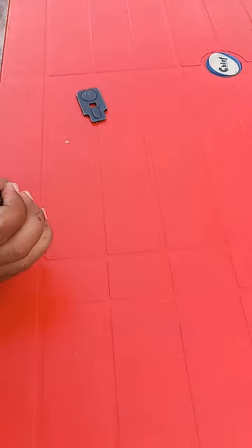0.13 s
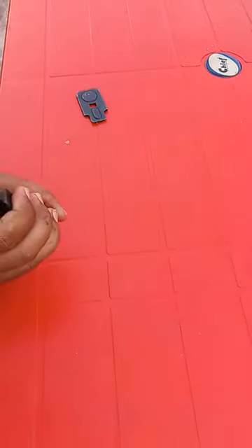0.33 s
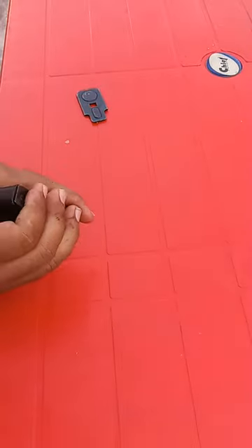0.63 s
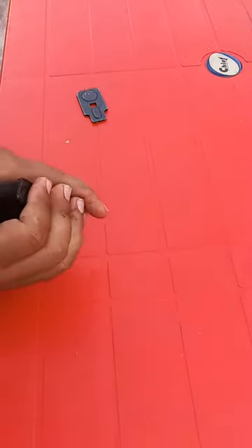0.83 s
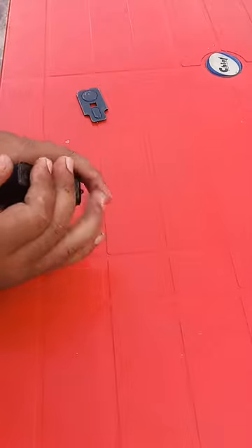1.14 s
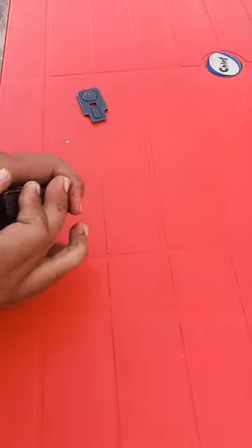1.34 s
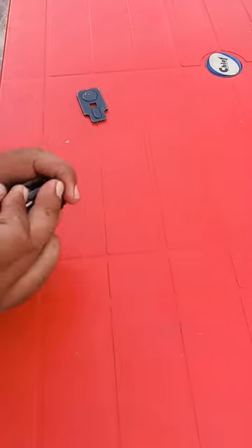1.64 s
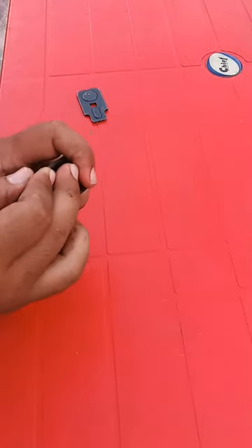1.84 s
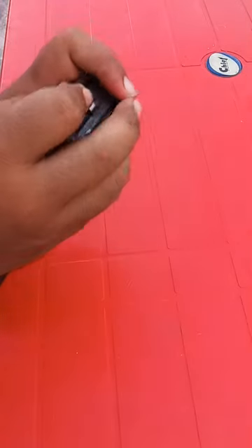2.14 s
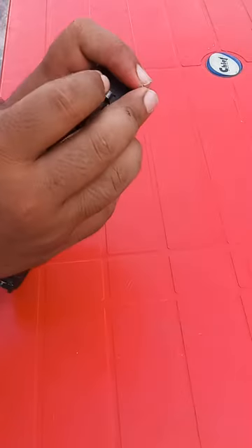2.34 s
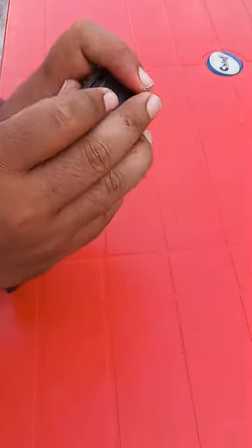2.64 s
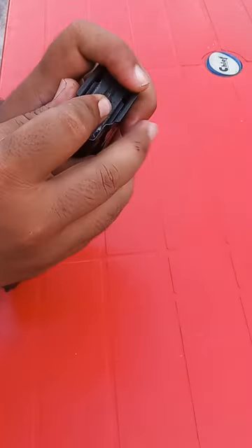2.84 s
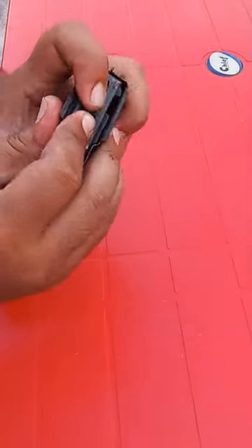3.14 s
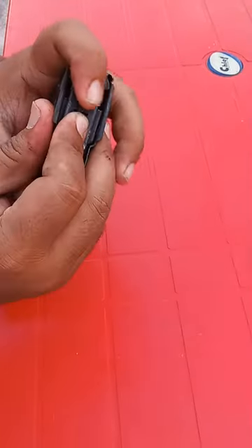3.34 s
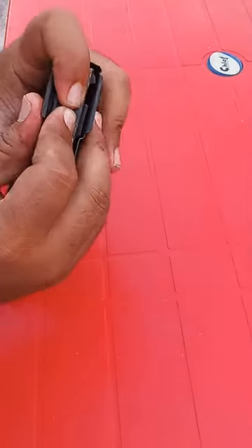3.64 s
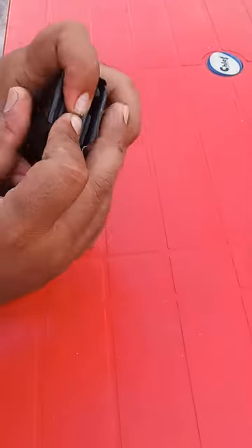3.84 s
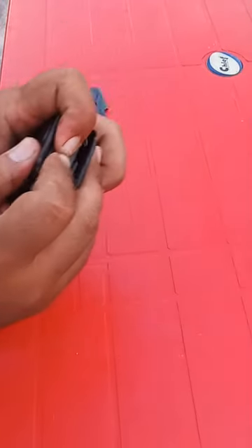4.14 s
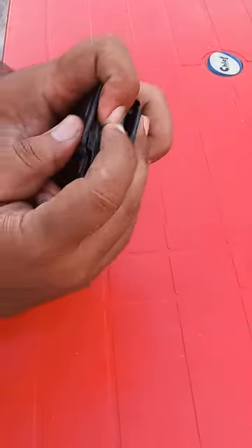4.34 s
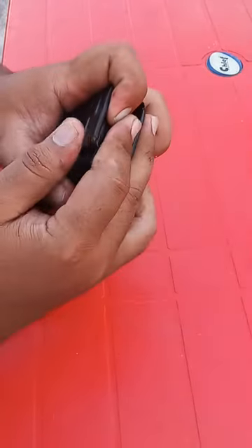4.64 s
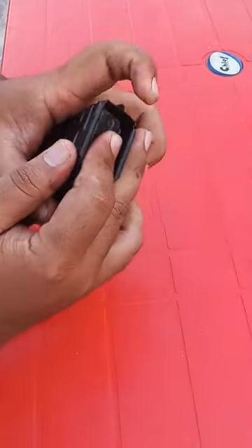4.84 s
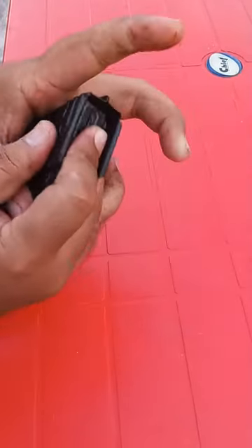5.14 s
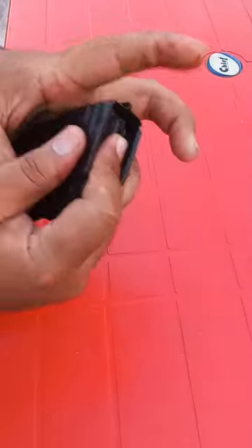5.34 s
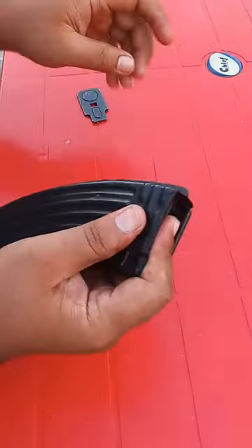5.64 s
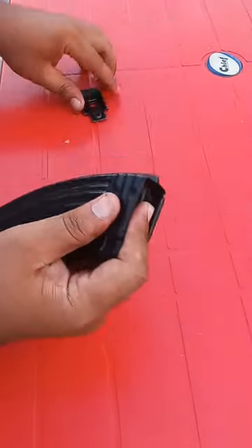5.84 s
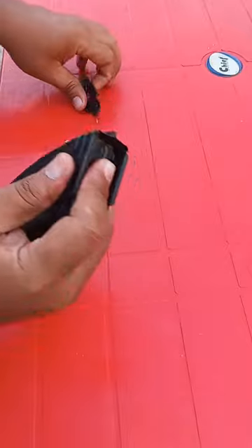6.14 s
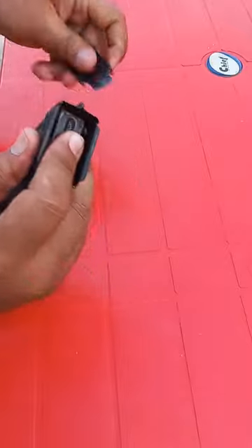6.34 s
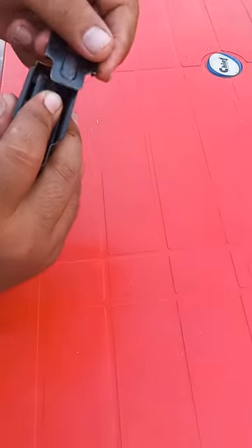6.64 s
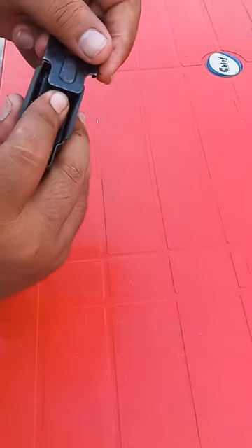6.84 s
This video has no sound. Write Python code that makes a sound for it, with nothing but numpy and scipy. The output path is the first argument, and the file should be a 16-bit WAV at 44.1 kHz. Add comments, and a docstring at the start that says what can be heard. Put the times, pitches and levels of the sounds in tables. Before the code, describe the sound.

Irregular handwork with small steel parts on a hollow plastic table outdoors, heard close and dry. First come bright, ringing catches and rough drags of a coil spring, then tighter snaps, ticks and short rubs with the tube muffled by fingers. Dull thumps and rumbles of the table punctuate them. It calms, a light plate is scraped up and slides against steel, while faint chirps and a late far horn sit behind.

```python
"""Sharp scrapes and catches come first: a steel spring is fed by hand into the open tube of a rifle magazine.
It rests on a plastic table close to the microphone; stick-slip pulses excite steel, tube air and coil modes.
Fingers then cover the end and press the spring home in sharp clicks; rubs, squeaks and bumps lie between.
The magazine knocks on the table, whose modes boom under a grainy scuff, and a small plate is picked up.
Far away, gliding sines make birds and two wavering partials a horn, over the shaped noise of outdoor air."""
import sys
import numpy as np
from scipy import signal
from scipy.fft import rfft, irfft
from scipy.io import wavfile

SR = 44100
rng = np.random.default_rng(int(sys.argv[2]) if len(sys.argv) > 2 else 0)


def inscribe(sig):
    """Save sig as 16-bit PCM at rate SR to the path in sys.argv[1].

    A 1-D sig is mono; a 2-D sig holds one channel per row.
    Samples are clipped to [-1, 1] before scaling.
    """
    pcm = np.round(np.clip(np.atleast_2d(sig).T, -1, 1) * 32767)
    wavfile.write(sys.argv[1], SR, pcm.astype(np.int16))


N = 307377
TIME = np.arange(N) / SR
AGE = TIME[:SR * 2 // 5]  # seconds since a blow or the start of a stroke


def undb(db):
    """Decibels to gain."""
    return 10 ** (np.asarray(db) / 20)


def level(x, db):
    """Set the rms of a steady sound."""
    return x * undb(db) / np.sqrt(np.mean(x ** 2))


def burst(x, db):
    """Set the energy of a blow, as its rms if packed into 5 ms."""
    return x * undb(db) / np.sqrt(np.sum(x ** 2) / (SR / 200))


def add(out, s, x):
    """Mix x into out from time s."""
    start = max(int(s * SR), 0)
    out[start:start + len(x)] += x[:max(N - start, 0)]


def through(x, response):
    """Pass x through an impulse response."""
    return signal.fftconvolve(x, response)[:len(x)]


def cut(x, hz, kind, order=3):
    """High-pass or low-pass."""
    return signal.sosfilt(signal.butter(order, hz, kind, fs=SR, output="sos"), x)


def fade(t60):
    """Exponential decay, 60 dB down after t60 seconds."""
    return np.exp(-np.log(1000) * AGE / max(t60, 1e-4))


def noise(t60):
    """A dying burst of noise: countless overlapping modes."""
    return rng.standard_normal(len(AGE)) * fade(t60)


def walk(rate):
    """Smooth random wandering through rate new values a second, spread near 1."""
    knots = rng.standard_normal(int(N / SR * rate) + 2)
    return np.interp(TIME * rate, np.arange(len(knots)), knots)


def swell(length):
    """One smooth rise and fall of pressure."""
    return np.sin(np.pi * np.minimum(AGE / length, 1))


def colour(points, size=2048):
    """Causal (minimum-phase) impulse response with the given spectrum."""
    hz, db = np.transpose(points)
    bin_hz = np.arange(size // 2 + 1) * SR / size
    log_gain = np.log(undb(np.interp(np.log(bin_hz + 1), np.log(hz), db)))
    # folding the cepstrum onto positive times makes the response causal
    cepstrum = irfft(log_gain)
    cepstrum[1:size // 2] *= 2
    cepstrum[size // 2 + 1:] = 0
    return irfft(np.exp(rfft(cepstrum)))


def struck(table, scatter_db, detune=0.025):
    """Modes as decaying sines; each point of contact weights them differently and each grip detunes them."""
    t, ring = AGE[:SR // 5], np.zeros(len(AGE))
    draws = rng.standard_normal((len(table), 3))
    for (hz, db, t60), (weight, shift, side) in zip(table, draws):
        gain = np.sign(side) * undb(db + scatter_db * weight)
        decay = np.exp(-np.log(1000) * t / t60)
        ring[:len(t)] += gain * decay * np.sin(2 * np.pi * hz * (1 + detune * shift) * t)
    return ring


def slips(count, rate, spread_db):
    """Stick-slip friction: sparse pulses of very uneven size."""
    fires = rng.random(count) < rate / SR
    sign = rng.choice([-1, 1], count)
    return fires * sign * undb(spread_db * np.minimum(rng.exponential(size=count), 4))


def chatter(ms, lead_ms=0):
    """Slips build up for lead ms, the contact snaps, and a flurry of slips dies away."""
    late_ms = AGE * 1000 - lead_ms
    time_ms = np.where(late_ms < 0, .01 + lead_ms / 4, max(ms, .2))
    force = .35 * slips(len(AGE), rate=3500, spread_db=2) * np.exp(-np.abs(late_ms) / time_ms)
    force[np.argmin(np.abs(late_ms))] = 1  # the snap itself
    return force


# Outdoor air around the table. Each row: frequency in Hz, relative level in dB.
AIR_SPECTRUM = [(30, -14.5), (127, 5), (259, -3), (540, -1.5), (801, -9.5), (1350, -4), (1760, -9),
                (4420, -14), (6210, -5), (8080, -22.5), (9710, -18), (11400, -33), (14800, -33)]


def outdoor_air():
    """Quiet air as coloured noise that wanders around -67 dB."""
    hush = through(rng.standard_normal(N), colour(AIR_SPECTRUM))
    return level(hush, -67) * undb(walk(1.9))


# Spectrum of the wire itself. Each row: frequency in Hz, relative level in dB.
SPRING_SPECTRUM = [(200, -32.5), (500, -9.5), (900, -5.5), (1700, 3.5), (2300, -2), (3500, 1), (4800, -3.5),
                   (6400, 3), (7200, -6.5), (8000, -13), (10000, -21), (13000, -34)]
# Strongest modes of the spring. Each entry: frequency in Hz.
STRONG_COIL_HZ = [1885, 2071, 2325, 2757, 4120, 4545, 4950, 5630, 6309, 6660]


def coil(t60, strong_db=8, count=360):
    """The long wire has many close, slowly dying modes of very uneven strength."""
    hz, size = rng.uniform(500, 9000, count), rng.standard_normal(count)
    hz = np.append(hz, STRONG_COIL_HZ)
    size = np.append(size, np.full(len(STRONG_COIL_HZ), undb(strong_db)))
    wire = size @ np.sin(2 * np.pi * np.outer(hz, AGE).astype(np.float32))
    return through(wire * fade(t60), colour(SPRING_SPECTRUM))


# Crack of steel on the tube. Each row: frequency in Hz, relative level in dB.
STEEL_SPECTRUM = [(200, -46), (450, -17), (900, -7.5), (1800, 0), (3000, 0.5), (4500, 0.5), (6400, 6.5),
                  (7200, -0.5), (8000, -7), (9700, -1), (11500, -10), (13500, -13), (15500, -11)]
# Modes of the magazine walls. Each row: frequency in Hz, relative level in dB, t60 in seconds.
WALL_MODES = [(2049, -2, 0.072), (2313, -1.5, 0.037), (2740, -2, 0.03), (3415, 0.5, .06), (3840, 2, 0.07),
              (4457, -3.5, 0.065), (5145, -10.5, 0.037), (5840, -2, 0.033), (6470, 1, 0.042),
              (6900, 7.5, 0.048), (9325, 6.5, 0.027)]


def clicks(blows, air, gain_db, hollow_gain_db, treble_gain_db, wall_db, chatter_ms, crack_t60, ring_db,
           spring_t60):
    """Steel snaps against the tube: a crack, the walls and the enclosed air ring, and the spring sings on."""
    out, steel, spring = np.zeros(N), colour(STEEL_SPECTRUM), coil(spring_t60)
    lead_ms = 6
    for s, db, hollow_db, treble_db in blows:
        force = chatter(chatter_ms, lead_ms)
        crack = through(burst(force, 0.33) + burst(through(force, noise(crack_t60)), 0), steel)
        metal = burst(crack, 0) + burst(through(force, struck(WALL_MODES, scatter_db=-5.0)), wall_db)
        hollow = cut(through(force, struck(air, scatter_db=0.5)), 700, "high")
        hit = burst(cut(metal, 7500, "low", order=5), 0)
        hit += burst(cut(metal, 7500, "high"), min(treble_db + treble_gain_db, -6))  # treble is capped
        hit += burst(hollow, hollow_db + hollow_gain_db)
        hit += burst(through(force, spring), ring_db)
        add(out, s - lead_ms / 1000, undb(db + gain_db) * hit)
    return out


def slide(strokes, air, body, gain_db, wall_db, hollow_db, ring_db, tilt_hz, grain_rate):
    """The wire rubs along the walls in jerks and excites their resonances; harder rubbing is denser and brighter."""
    out, contact, spring = np.zeros(N), colour(body), colour(SPRING_SPECTRUM)
    for s, length, db in strokes:
        grains = slips(len(AGE), rate=grain_rate * undb((db + 45) / 2), spread_db=4)
        force = grains * swell(length) * undb(3 * walk(90)[:len(AGE)])
        walls = cut(struck(WALL_MODES, scatter_db=4.5), 4500, "low", order=2)
        hollow = cut(struck(air, scatter_db=3.5, detune=0.021), 420, "high")
        response = burst(through(noise(0.032), contact), 0) + burst(walls, wall_db)
        response += burst(hollow, hollow_db) + burst(through(noise(0.09), spring), ring_db)
        bright_hz = np.clip(tilt_hz * undb(db + 45), 4000, 15000)
        sound = cut(through(force, response), bright_hz, "low", order=1)
        # energy follows the length of the stroke
        add(out, s, level(sound, db + gain_db) * np.sqrt(length / AGE[-1]))
    return out


# Coils passing the rim of the open tube. Each row: snap time in seconds, level in dB before the feeding
# gain, time held on the rim in ms, run-up in seconds, drag afterwards in seconds.
CATCHES = [(0.008, -31.5, 1.1, 0.00018, 0), (0.044, -16.5, 13, 0.00044, 0.0036),
           (0.068, -13.5, 0.97, 0, 0.15), (0.258, -13, 8.3, 0.048, 0), (0.389, -28.5, 4.23, .03, 0.037),
           (0.439, -22, 0.96, 0.019, 0.0044), (0.496, -29, 0.81, 0, 0.025), (0.527, -18, 11.4, 0, 0.04),
           (0.627, -36, 1.3, 0.00032, 0.0039), (0.676, -14, 12.4, 0, 0.13), (0.73, -36.5, 1.01, 0, 0),
           (0.878, -12.5, 8, 0.015, 0.18)]
TOUCH_DB = -2  # first touch on the rim, against the snap
REBOUND_S, REBOUND_SHRINK, REBOUND_DB = .018, 0.57, -9  # typical first gap, ratio of gaps, change per rebound
RIM_HOLLOW_DB, RIM_HOLLOW_SLOPE = -6.5, -0.23  # tube air in a -22 dB blow, and its dB per dB of strength
RUN_UP_DB = -39.5  # scrape before a catch, before the feeding gain
DRAG_DB, SLOW_DRAG_DB = -37, -4  # a 50 ms drag, before the feeding gain; change per doubled length


def catch_blows():
    """Each coil touches the rim, snaps past and rebounds unevenly, ever sooner and softer; gentle is hollower."""
    blows = []
    for s, db, held_ms, _, _ in CATCHES:
        gap = REBOUND_S * rng.uniform(.8, 1.2)
        blows += [(s - held_ms / 1000, db + TOUCH_DB), (s, db)]
        blows += [(s + gap, db + REBOUND_DB), (s + gap * (1 + REBOUND_SHRINK), db + 2 * REBOUND_DB)]
    treble_db = -7
    return [(s, db, RIM_HOLLOW_DB + RIM_HOLLOW_SLOPE * (db + 22), treble_db) for s, db in blows]


def catch_scrapes():
    """The wire scrapes up to the rim and drags on into the tube; a slow drag is quieter."""
    run_ups = [(s - held_ms / 1000 - run_up, run_up, RUN_UP_DB)
               for s, _, held_ms, run_up, _ in CATCHES if run_up > 0]
    drags = [(s + REBOUND_S, drag, DRAG_DB + SLOW_DRAG_DB * np.log2(drag * 20))
             for s, _, _, _, drag in CATCHES if drag > 0]
    return run_ups + drags


# Air modes of the open tube. Each row: frequency in Hz, relative level in dB, t60 in seconds.
OPEN_AIR = [(569.3, -5, 0.13), (865, 4.5, 0.038), (1170, -14.5, 0.0129), (1323, -8, 0.13)]


def feeding():
    """Coils catch and scrape at the open tube, whose air rings behind them."""
    snaps = clicks(catch_blows(), OPEN_AIR, gain_db=-5.0, hollow_gain_db=-1.5, treble_gain_db=0.5,
                   wall_db=-10.5, chatter_ms=8.2, crack_t60=0.03, ring_db=-8, spring_t60=0.28)
    scrapes = slide(catch_scrapes(), OPEN_AIR, SPRING_SPECTRUM, gain_db=-5.0, wall_db=-5.0, hollow_db=-8.5,
                    ring_db=-1, tilt_hz=7000, grain_rate=1500)
    return snaps + scrapes


# Air modes of the covered tube. Each row: frequency in Hz, relative level in dB, t60 in seconds.
COVERED_AIR = [(535, -10, .065), (1250, -1, .06), (1335, 0, .05), (1590, -7, .04)]
# Dull bumps of fingers and spring against the tube. Each row: start in seconds, level in dB.
BUMPS = [(0.763, -32.5), (1.857, -52), (2.606, -48), (1.964, -48), (2.227, -48.5), (2.482, -40),
         (2.976, -57), (3.07, -46.5), (5.288, -49.5), (5.44, -56)]


def bumps():
    """A soft blow makes no crack: only the air in the tube and a short thud of the walls."""
    out, wall = np.zeros(N), colour([(250, -22), (1300, 9), (3000, -17.5), (9000, -26.5)])
    for s, db in BUMPS:
        body = burst(struck(COVERED_AIR, scatter_db=4.5), -0.5) + burst(through(noise(0.043), wall), 0)
        add(out, s, burst(through(chatter(2.3), body), db))
    return out


# The wire skidding along the walls. Each row: start in seconds, length in seconds, start pitch in Hz,
# end pitch in Hz, typical peak level in dB.
SQUEAKS = [(0.888, 0.18, 870, 1082, -47), (0.929, 0.2, 1670, 1770, -51), (0.952, 0.067, 2450, 2940, -47.5),
           (4.92, .15, 2560, 3610, -64.5), (5.057, 0.06, 4060, 3000, -54), (5.125, 0.062, 3780, 2630, -54)]


def squeaks(rough):
    """The wire skids along the wall; its rough pitch glides as the free length changes."""
    out = np.zeros(N)
    for s, length, start_hz, end_hz, db in SQUEAKS:
        hz = np.interp(AGE, [0, length], [start_hz, end_hz]) * (1 + rough * walk(900)[:len(AGE)])
        loudness = undb(db + 4 * walk(150)[:len(AGE)]) * swell(length)
        add(out, s, loudness * np.sin(2 * np.pi * np.cumsum(hz) / SR))
    return out


# One far bird repeating a falling note. Each row: start in seconds, level in dB before doubling and echo.
CHIRPS = [(1.353, -47), (1.893, -48), (2.733, -43.5), (4.083, -51.5)]
# Other far birds holding a note. Each row: start in seconds, length in seconds, pitch in Hz,
# level in dB before doubling and echo.
WHISTLES = [(1.106, 0.069, 3320, -67.5), (1.287, 0.14, 3400, -64), (1.508, .093, 3400, -66),
            (5.543, 0.031, 570, -54)]
CHIRP_S, CHIRP_HZ, CHIRP_END_HZ = 0.018, 1226, 935


def birds():
    """Short gliding notes and held ones, blurred by distance."""
    out = np.zeros(N)
    notes = [(s, CHIRP_S, CHIRP_HZ, CHIRP_END_HZ, db) for s, db in CHIRPS]
    notes += [(s, length, hz, hz, db) for s, length, hz, db in WHISTLES]
    for s, length, start_hz, end_hz, db in notes:
        u = AGE[AGE < length] / length
        hz = (start_hz + (end_hz - start_hz) * u) * (1 + .012 * walk(300)[:len(u)])
        add(out, s, undb(db) * 2 * np.sin(np.pi * u) * np.sin(2 * np.pi * np.cumsum(hz) / SR))
    echo = noise(0.26)
    return out + undb(-4.0) * through(out, echo / np.linalg.norm(echo))


# The spring pressed home under the fingers. Each row: start in seconds, level in dB before the pressing
# gain, tube air in dB and treble in dB against the click before their gains, slide after in seconds.
CLICKS = [(1.637, -31, -1.5, -26, 0.082), (1.942, -35, -6.5, -43, 0.051), (2.205, -29, -0.5, -28, 0.037),
          (2.427, -17.5, -7.5, -14.5, .2), (2.798, -15.5, -8.5, -21, 0.1), (2.933, -29.5, 7.5, -36, 0.056),
          (3.384, -32.5, -11, -14, 0), (3.571, -25, -4.5, -13.5, 0.082), (4.238, -19.5, 4.5, -9, .06),
          (4.4234, -16.5, -2.5, -8.5, 0.11), (4.52, -28.5, 0, -11, 0.0044), (4.68, -20.5, -3, -5, .04),
          (4.834, -15.5, -4.5, -13, 0.034), (4.856, -31, 8, -23, 0), (5.129, -37.5, 4, -14, 0.04),
          (5.918, -36.5, -18, -4, 0), (6.746, -27.5, -24, -2.5, 0.035)]
# Single coils slipping a little, with no slide. Each row: start in seconds, level in dB before the gain.
TICKS = [(1.651, -30.5), (1.667, -35), (2.763, -40.5), (2.939, -39), (3.118, -50.5), (3.393, -42.5),
         (4.291, -40), (4.303, -37), (4.468, -33.5), (4.498, -32), (4.509, -34.5), (4.555, -35.5),
         (4.674, -33.5), (6.238, -44.5)]
# Fingers shifting the spring between clicks. Each row: start in seconds, length in seconds,
# level in dB before the pressing gain.
RUBS = [(1.762, 0.051, -55), (3.056, 0.12, -51), (3.186, 0.12, -47), (3.735, 0.056, -56),
        (3.836, 0.021, -58), (4.279, 0.064, -50.5), (4.363, 0.062, -43.5), (4.491, .11, -41.5),
        (5.39, .11, -62), (5.764, 0.036, -59)]
# Wire rubbing the walls. Each row: frequency in Hz, relative level in dB.
WIRE_SPECTRUM = [(300, -29), (550, -5), (900, -20), (1300, -4), (2000, 1), (2700, -4.5), (3700, 3.5),
                 (4800, -7.5), (6400, 3.5), (8000, -9), (16000, -19.5)]
SETTLE_S, SETTLE_DB = .013, -14.5  # nominal delay of the settling tick, and its level against the click
BREAK_S, BREAK_DB = 0.015, 2  # a rub breaks loose with a tick: its delay, and its level against the rub
BREAK_HOLLOW_DB, BREAK_TREBLE_DB = -0.5, -15.5
TICK_HOLLOW_DB, TICK_TREBLE_DB = -5, -12
CREEP_S, CREEP_DB = .018, -24  # the wire creeping before it lets go: its length, and level against the click
SLIDE_DB, SLIDE_SLOPE = -49.5, 0.4  # slide after a -20 dB click, before the gain; its dB per dB of strength


def press_blows():
    """Each click is followed by a softer tick as the wire settles, and each rub breaks loose with a tick."""
    snaps = [(s, db, hollow_db, treble_db) for s, db, hollow_db, treble_db, _ in CLICKS]
    settles = [(s + SETTLE_S * rng.uniform(0.63, 1.8), db + SETTLE_DB, *tone) for s, db, *tone in snaps]
    breaks = [(s + BREAK_S, db + BREAK_DB, BREAK_HOLLOW_DB, BREAK_TREBLE_DB) for s, _, db in RUBS]
    ticks = [(s, db, TICK_HOLLOW_DB, TICK_TREBLE_DB) for s, db in TICKS]
    return snaps + settles + breaks + ticks


def press_scrapes():
    """The wire creeps before a click and may slide on after it, louder after a hard one."""
    creeps = [(s - CREEP_S, CREEP_S, db + CREEP_DB) for s, db, *_ in CLICKS]
    slides = [(s + SETTLE_S / 2, length, SLIDE_DB + SLIDE_SLOPE * (db + 20.0))
              for s, db, _, _, length in CLICKS if length > 0]
    return creeps + slides


def pressing():
    """The wire clicks and rubs home in the tube, whose air is closed off by the fingers."""
    snaps = clicks(press_blows(), COVERED_AIR, gain_db=-2.5, hollow_gain_db=-1.5, treble_gain_db=4.5,
                   wall_db=-5.5, chatter_ms=0.8, crack_t60=0.038, ring_db=-16.5, spring_t60=0.23)
    scrapes = slide(press_scrapes() + RUBS, COVERED_AIR, WIRE_SPECTRUM, gain_db=-2.5, wall_db=-4.0,
                    hollow_db=-0.5, ring_db=-7, tilt_hz=6500, grain_rate=1200)
    return snaps + scrapes


def palms():
    """Skin brushes dully over the tube as the grip changes."""
    skin = colour([(150, -26), (450, 4), (2500, -14), (7000, -24), (12000, -50)])
    brush = level(through(slips(N, rate=1000, spread_db=3.5), skin), -52)
    return brush * np.interp(TIME, [1.75, 1.95, 2.3], [0, 1, 0]) ** 2


# The magazine meeting the table. Each row: start in seconds, level of the boom in dB, contact in ms.
KNOCKS = [(2.338, -16.5, 0.44), (2.428, -31, 7.2), (3.529, -18.5, 0.58), (3.572, -21.5, 1.3),
          (4.737, -41, 38), (4.915, -40.5, 17), (5.504, -37.5, 32), (5.585, -40.5, 19), (5.893, -29, 0.51),
          (5.937, -37, 13), (6.265, -20.5, 0.48), (6.625, -32.5, 19), (6.851, -18, 1.15)]
# Modes of the table top. Each row: frequency in Hz, relative level in dB, t60 in seconds.
TABLE_MODES = [(79, -10, 0.2), (115, -5.5, 0.17), (162, 0.5, 0.11), (194, -1, 0.14), (228.7, 2.5, 0.14),
               (325, -9.5, 0.2), (451, -8.5, 0.1), (534.4, -4.5, 0.13)]
# Grit under the magazine. Each row: frequency in Hz, relative level in dB.
SCUFF_SPECTRUM = [(60, -33), (150, -2.5), (400, 12), (800, 0.5), (1250, -4), (1800, -9.5), (3500, -14.5),
                  (6500, -16), (8000, -28), (16000, -40)]
SCUFF_DB, SCUFF_SOFT_DB = -13.5, -3.5  # grit of a 1 ms contact against the boom; change per doubled contact


def knocks():
    """The hollow plastic table booms; a softer contact pushes longer, scuffs less and reaches only low modes."""
    out, scuff = np.zeros(N), colour(SCUFF_SPECTRUM)
    for s, db, contact_ms in KNOCKS:
        push = AGE * np.exp(-AGE * 4000 / max(contact_ms, .2))
        boom = cut(through(push, struck(TABLE_MODES, scatter_db=1, detune=.01)), 65, "high")
        grit = through(noise(0.076) + 0.63 * noise(0.19), scuff)
        grit_db = db + SCUFF_DB + SCUFF_SOFT_DB * np.log2(max(contact_ms, .5))
        add(out, s, burst(boom, db) + burst(grit, grit_db))
    return out


# Hands leaning on the table. Each row: start in seconds, end in seconds, level in dB before unevenness.
LEANS = [(2.417, 2.577, -54), (2.784, 3.15, -58.5), (4.69, 4.808, -56.5), (5.056, 5.29, -54.5),
         (5.83, 6.137, -56), (6.57, 6.962, -55)]
LEAN_RAMP_S, HOVER_DB = 0.069, -80.5  # time to put weight on or take it off; rumble with the hands lifted
SHIFT_DB = 5  # unevenness of the weight on the table


def handling():
    """While the hands lean on the table, every shift makes the top rumble."""
    weight = undb(HOVER_DB)
    for start, end, db in LEANS:
        corners = [start - LEAN_RAMP_S, start, end, end + LEAN_RAMP_S]
        weight = weight + undb(db) * np.interp(TIME, corners, [0, 1, 1, 0])
    top = colour([(25, -22.5), (55, -2), (85, 5.5), (180, -3.5), (280, -24), (600, -27.0), (1200, -34),
                  (4000, -76.0)])
    return level(through(rng.standard_normal(N), top), 0) * weight * undb(SHIFT_DB * walk(11))


# The small plate tapping and dragging on the table top. Each row: start in seconds, level in dB,
# decay time of the drag in ms.
PLATE_TAPS = [(5.913, -38, 27), (6.019, -42, 13), (6.091, -46, 2.5), (6.235, -32, 7.9)]
# Modes of the plate lying on the table. Each row: frequency in Hz, relative level in dB, t60 in seconds.
PLATE_MODES = [(466, -5.5, 0.09), (594, -2, 0.13), (623, 8, 0.061), (780, -2, 0.04), (1360, 6, 0.019)]


def plate():
    """Fingers drag the small plate over the table to lift it: dying slips excite its short modes."""
    out = np.zeros(N)
    for s, db, drag_ms in PLATE_TAPS:
        add(out, s, burst(through(chatter(drag_ms), struck(PLATE_MODES, scatter_db=-3.0)), db))
    return out


# Plate and fingertips sliding flat over table and steel. Each row: start in seconds, length in seconds,
# level in dB at the height of the stroke.
GLIDES = [(6.215, 0.11, -53), (6.801, .1, -59), (6.891, 0.081, -48)]


def glides():
    """Flat faces sliding on each other: fine, dense grains with no ring."""
    pressure = np.zeros(N)
    face = colour([(300, -6), (1200, 2), (4500, -4.5), (6400, 5), (8000, -8), (15000, -14.5)])
    for s, length, db in GLIDES:
        add(pressure, s, undb(db) * swell(length))
    return level(through(slips(N, rate=6000, spread_db=3.5), face), 0.81) * pressure


def horn(hz, low_db, high_db):
    """A far horn: two partials, an octave apart, that waver on their way."""
    phase = 2 * np.pi * np.cumsum(hz * (1 + .012 * walk(20))) / SR
    low = undb(low_db + 2 * walk(12)) * np.sin(phase)
    high = undb(high_db + 3 * walk(12)) * np.sin(2 * phase)
    return (low + high) * np.interp(TIME, [6.46, 6.66, 6.84, 6.95], [0, 1, 1, 0])


def scene():
    """Spring, magazine and table close by, over birds, a horn and quiet outdoor air."""
    spring = feeding() + pressing() + squeaks(rough=.075) + bumps()
    table = knocks() + plate() + glides() + palms() + handling()
    far = birds() + horn(hz=381, low_db=-54.5, high_db=-62.5) + outdoor_air()
    return (spring + table + far)[None]


def record(dry):
    """The microphone loses the deepest bass and the recorder cuts the top."""
    top_hz = 15900
    bass_cut = cut(dry, 27, "high", order=2)
    return signal.sosfilt(signal.ellip(8, .2, 70, top_hz, fs=SR, output="sos"), bass_cut)


dry = scene()
out = record(dry)
inscribe(out)
```